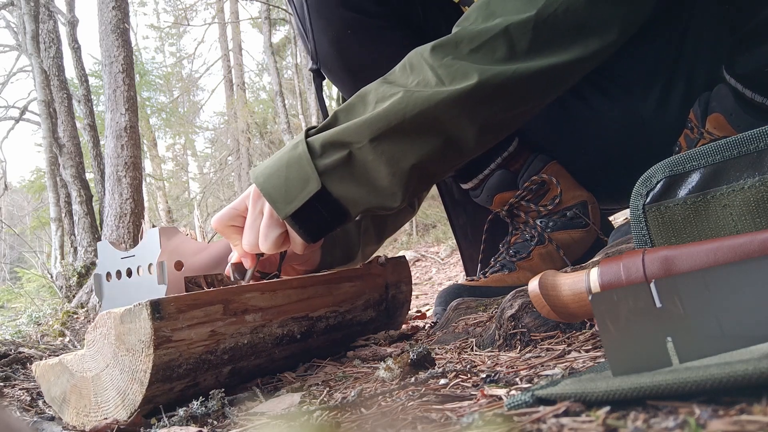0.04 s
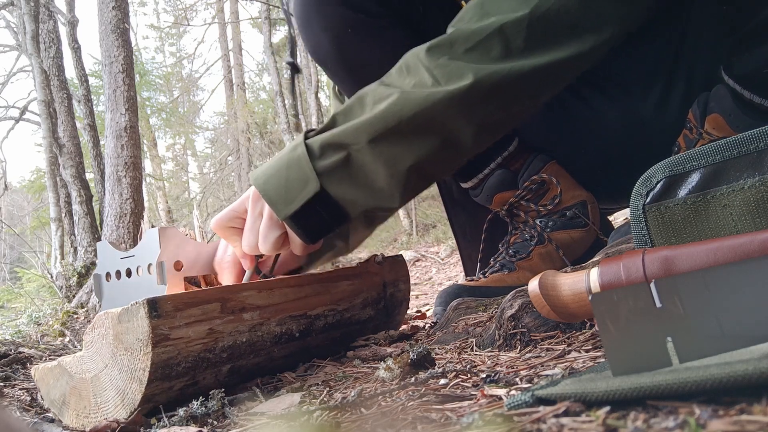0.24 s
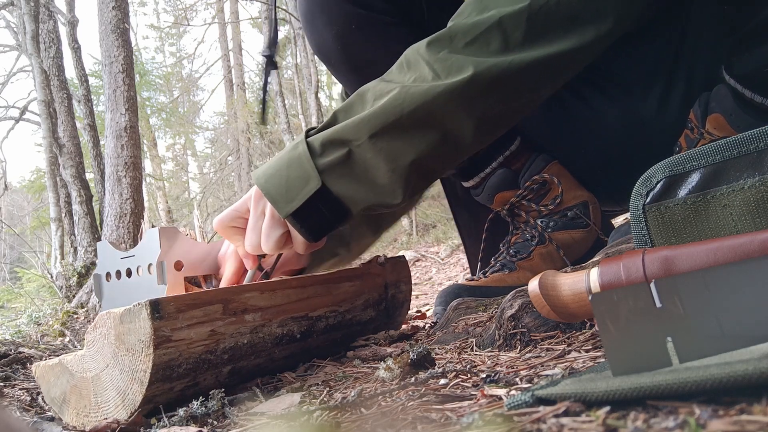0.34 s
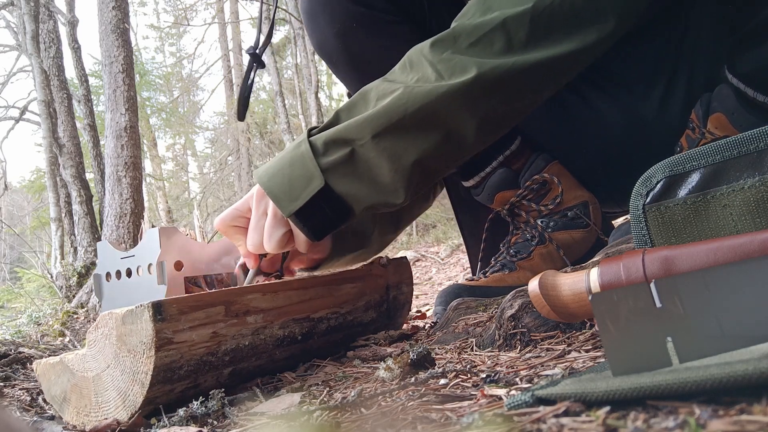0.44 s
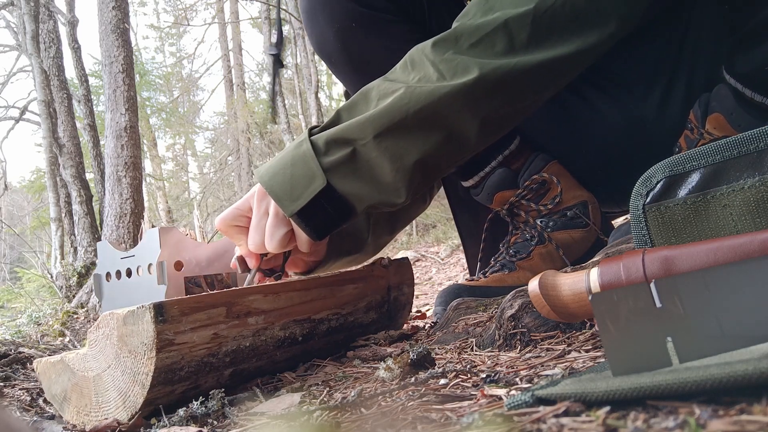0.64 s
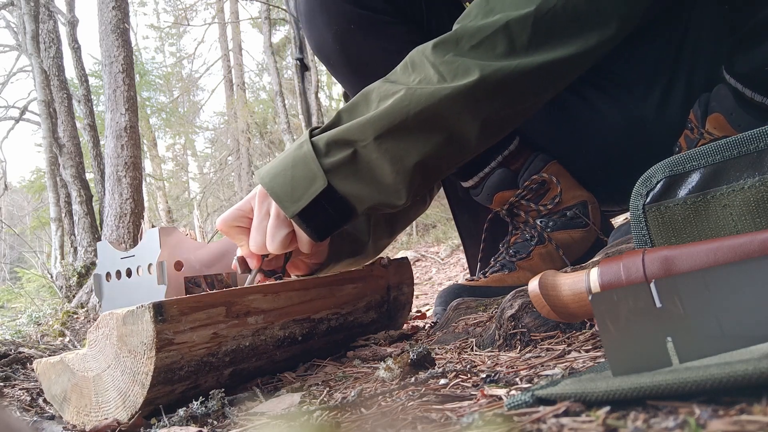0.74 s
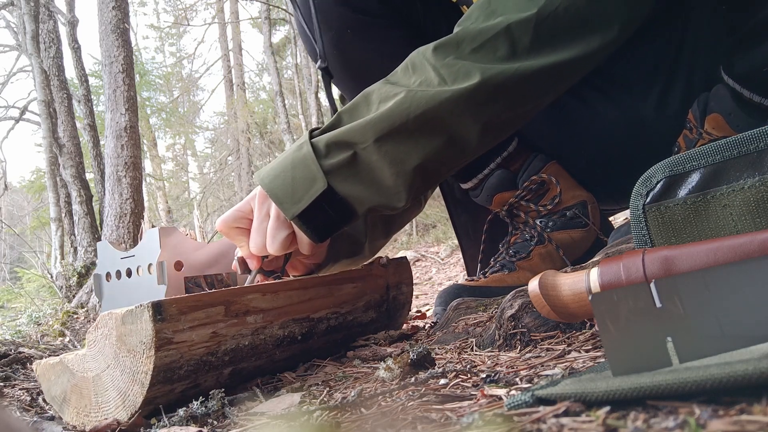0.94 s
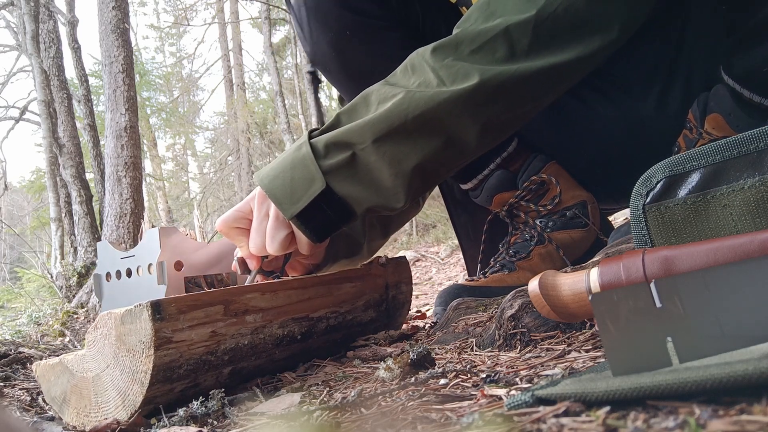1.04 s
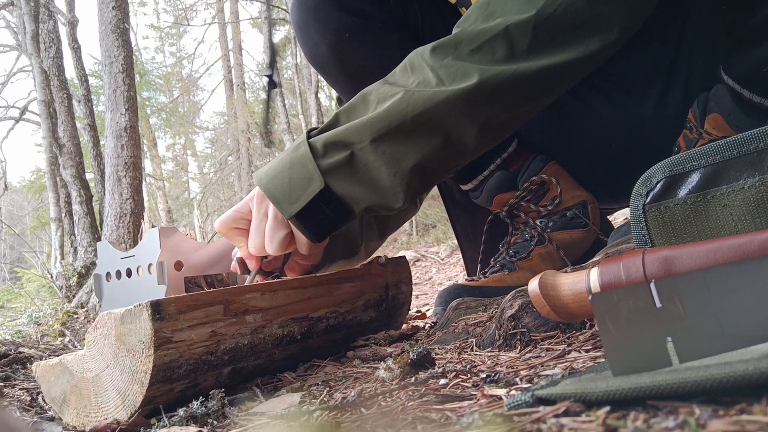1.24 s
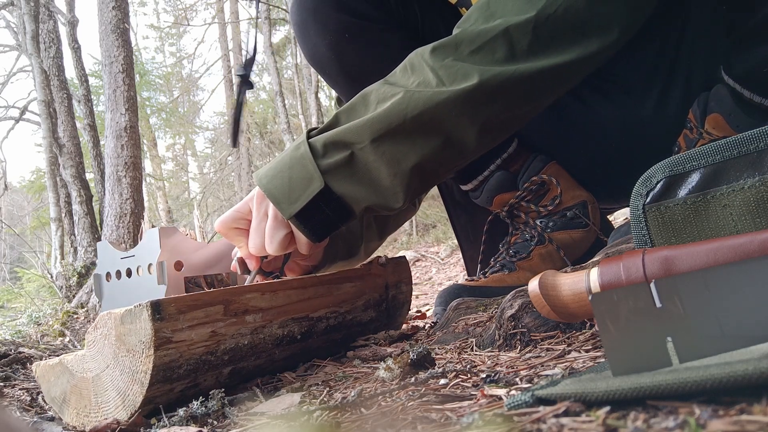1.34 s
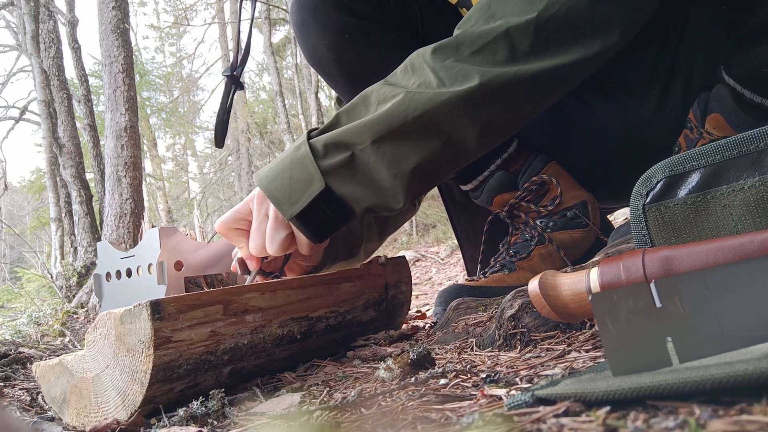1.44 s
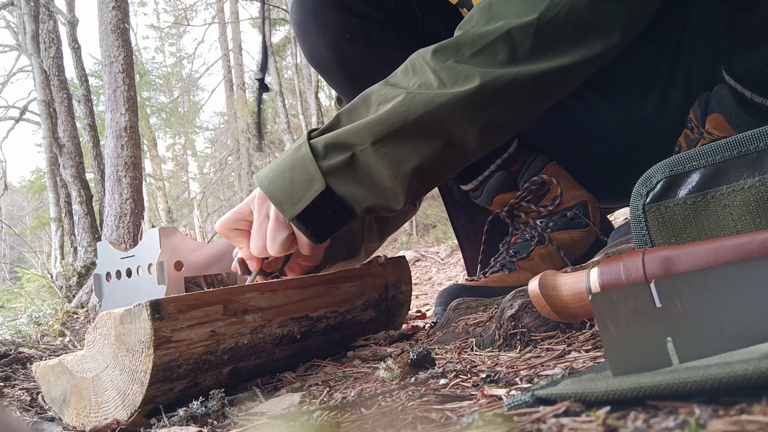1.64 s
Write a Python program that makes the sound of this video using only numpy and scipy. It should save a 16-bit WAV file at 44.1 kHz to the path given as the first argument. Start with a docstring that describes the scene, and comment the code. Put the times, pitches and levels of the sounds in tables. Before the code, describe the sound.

A metal striker scrapes sharply down a fire-starting rod at about 0.2 seconds, close, gritty and ringing. A hand thumps dully on a log at 0.3 seconds as short rasps trail off. The striker slides lightly back from 0.5 seconds, ending in a click and wooden knock at 0.7. Lighter clicks come at 1.4 and 1.7 seconds, over faint, low forest air.

```python
"""A steel striker scrapes down a ferro rod braced on a split log, close by in a quiet forest.
Stick-slip friction drives the rod's modes and tears off hissing grit; the edge skids on in short rasps
while the hand thumps the log, then slides lightly back. Impacts knock the log and click the striker
as the tools are set for the next stroke. Behind them lie a faint echo from the trunks,
low wavering air and two thin, distant whistles."""
import sys
import numpy as np
from scipy import signal
from scipy.fft import rfft, irfft
from scipy.io import wavfile
from scipy.ndimage import uniform_filter1d

SR = 44100
rng = np.random.default_rng(int(sys.argv[2]) if len(sys.argv) > 2 else 0)


def store_wav(level_fs):
    """Save 16-bit WAV to argv[1]."""
    pcm = np.round(np.clip(np.atleast_2d(level_fs), -1, 1) * 32767)
    wavfile.write(sys.argv[1], SR, pcm.T.astype(np.int16))


N = 74970

# spectrum of grit torn from the rod (frequency [Hz], relative level [dB])
GRIT_SPECTRUM = [(200, -11), (1000, -2.5), (2200, -0.5), (3300, -3), (4400, -2), (6000, -6), (7700, -5),
                 (9300, -12), (10400, -8), (11400, -1.5), (13800, -7.5), (15000, -9), (16000, -13.5)]
CHATTER_HZ = 447.94  # rate at which the edge's grip wanders


def scrape():
    """Frictional excitation: one train of catches rings the rod, tears off grit and shakes the log."""
    # force on the striker in the main stroke (time [s], level [dB])
    stroke = [(.212, -43.5), (0.219, -27), (0.225, -17.5), (.238, -13.5), (.245, -5), (.256, -4),
              (.268, -3), (.28, 2.5), (.286, -3), (.294, -19.5)]
    # skids after it (peak time [s], rise [s], fall [s], rod [dB], grit [dB], wood [dB])
    skids = [(.298, 0.003, .012, -30, -41, -39.5), (.304, 0.0056, .010, -24.5, -47, -30),
             (.321, 0.0091, .016, -31, -42, -38), (.336, 0.0095, .006, -33.5, -32, -26.5),
             (.344, 0.011, .012, -29.5, -36, -28), (.357, 0.004, .018, -37.5, -53, -40),
             (0.377, 0.024, 0.019, -45.5, -39, -33), (.387, 0.0042, .010, -36, -41, -33.5),
             (0.401, 0.0091, 0.025, -80, -51.5, -50), (0.424, 0.0072, .016, -59, -39.5, -34),
             (.438, 0.0053, .012, -41.5, -42, -43), (.452, 0.0084, .008, -32.5, -36.5, -35.5),
             (.471, 0.013, .009, -48.5, -43, -34.5), (0.487, 0.023, .028, -76, -50.5, -46)]
    times, levels = np.array(stroke).T
    force = undb(np.interp(np.arange(N) / SR, times, levels, left=-120, right=-120))
    rod = force * undb(-23.5)
    grit = force ** 1.27 * undb(-33)  # grit and wood grow faster than the force
    wood = force ** 1.6 * undb(-35)
    for peak, rise, fall, rod_db, grit_db, wood_db in skids:
        contact = swell(peak, rise, fall)
        rod += contact * undb(rod_db)
        grit += contact * undb(grit_db)
        wood += contact * undb(wood_db)
    catches = friction()
    # friction keeps the rod's modes sounding, so their ring follows the contact closely
    ringing = rod * squeal(catches) * undb(2.0 * walk(CHATTER_HZ))
    return ringing + colour(catches * grit, GRIT_SPECTRUM) + log_knock(catches * wood)


def friction(catches_per_s=7000, spread_db=4, chatter_db=2.5):
    """Stick-slip: the edge catches in tiny random impulses, uneven in size and bunched by chatter."""
    caught = rng.random(N) < catches_per_s / SR
    size_db = spread_db * np.clip(rng.standard_normal(N), -2, 2) + chatter_db * walk(CHATTER_HZ)
    return unit(caught * undb(size_db) * np.sign(rng.standard_normal(N)))


def squeal(catches, bite_s=0.28, evenness=.65):
    """Sustained vibration: friction holds each rod mode nearly even; the low ones fade with travel."""
    # modes of rod and striker pressed together
    # (frequency [Hz], bandwidth [Hz], relative level [dB], drift as the edge travels [dB/s])
    pressed_modes = [(1112, 16, -5, -50), (1280, 110, -12, -35), (1570, 70, -15, -20), (1778, 24, -8, 0),
                     (1852, 26, -11, 22), (2040, 90, -14, 0), (2246, 16, -8, -12), (2630, 40, -23, 10),
                     (2970, 70, -19, 0)]
    travel_s = np.clip(np.arange(N) / SR - bite_s, -.1, .3)
    out = 0
    for hz, width, db, db_per_s in pressed_modes:
        mode = band(ring(catches, [(hz, width, 0)]), hz * 0.88, hz * 1.2, order=2)
        envelope = np.abs(signal.hilbert(mode)) + 1e-9
        out += unit(mode / envelope ** evenness) * undb(db + db_per_s * travel_s)
    return out


def log_knock(force):
    """Damped resonance: the log's broad, low modes answer a force dully, with little treble."""
    # modes of the log (frequency [Hz], bandwidth [Hz], relative level [dB])
    log_modes = [(178, 53, 0.5), (327.4, 110, -4.5), (580, 130, 2.5), (776, 150, -4), (966, 59, -17.5)]
    return band(ring(force, log_modes), 110, 1200, order=2)


def thud():
    """Soft impact: the hand's long contacts drive the low modes of log and ground."""
    # pushes of the hand (time [s], contact time [s], level [dB])
    pushes = [(.276, 0.0038, -7), (0.305, 0.0064, 12), (.32, 0.0064, 15.5), (.335, 0.0058, 4),
              (0.383, 0.0044, 1), (0.671, .003, -21), (1.404, 0.0025, -24.5)]
    # modes of the log on the ground (frequency [Hz], bandwidth [Hz], relative level [dB])
    deep_modes = [(58, 12.9, -8), (116.6, 38, -8), (139.7, 18, 2), (195, 44, -9)]
    force = sum(undb(db) * blow(at, contact) for at, contact, db in pushes)
    return band(ring(force, deep_modes), 44, 600, order=3)


def slide_back(chatter_db=3, chatter_hz=161):
    """Light sliding friction: the unloaded edge stutters and rings the rod thinly, with a little grit."""
    # slides back along the rod (peak time [s], rise [s], fall [s], level [dB])
    slides = [(0.55, 0.0051, 0.013, -45), (0.568, 0.023, 0.048, -52.5), (0.602, 0.024, 0.045, -60),
              (.635, 0.019, 0.021, -52.5), (0.685, 0.027, 0.028, -56), (0.726, 0.053, 0.026, -59)]
    # modes of rod and striker barely touching (frequency [Hz], bandwidth [Hz], relative level [dB])
    loose_modes = [(1090, 30, -1.5), (1785, 66, -3), (1878, 35, -2), (2140, 56, -0.5), (2213, 30, -0.5),
                   (2590, 55, -8), (2895, 100, -7.5), (4535, 200, -8.5), (5800, 220, -25), (6740, 185, -34),
                   (8200, 130, -11), (8540, 90, -31.5)]
    contact = sum(undb(db) * swell(peak, rise, fall) for peak, rise, fall, db in slides)
    force = friction() * contact * undb(chatter_db * walk(chatter_hz) - 1.0)
    ringing = band(ring(force, loose_modes), 1050, 8700, order=6)
    return ringing + undb(-16) * colour(force, GRIT_SPECTRUM)


def knocks():
    """Hard impact: each brief contact rings both log and striker, with a short gritty drag."""
    # tools striking the log (time [s], relative wood level [dB], relative click level [dB])
    impacts = [(.5505, -13.5, -34.5), (.6725, -22, -37), (0.7144, -12.5, -32), (0.7181, -10, -14),
               (0.7195, 2, -3), (0.722, -9, -2), (1.3971, -20.5, -12), (1.4045, -20.5, -20.5),
               (1.406, -14.5, -15), (1.685, -22.5, -33)]
    # modes of the striker (frequency [Hz], bandwidth [Hz], relative level [dB])
    striker_modes = [(3080, 360, -12), (4004, 370, 1), (4520, 210, -6.5), (5215, 320, -5.5),
                     (6600, 250, -7.5), (6530, 200, 4), (8310, 280, -4.5), (9500, 240, -14.5),
                     (10130, 280, -1), (11770, 170, 9), (12100, 380, -0.5), (12870, 330, 7),
                     (13700, 600, -6.5)]
    wood = sum(undb(db) * blow(at, contact=0.00038) for at, db, _ in impacts)
    tap = sum(undb(db) * (np.arange(N) == int(at * SR)) for at, _, db in impacts)
    drag = sum(undb(db) * swell(at, 0.0013, .004) for at, _, db in impacts)
    click = ring(undb(-18.5) * tap + undb(-30.5) * drag * friction(), striker_modes)
    return undb(-8) * log_knock(wood) + click


def touches():
    """Transient friction: the edge scratches stiffly on the rod as it finds its place."""
    # touches of the edge (time [s], level [dB], fall [s])
    contacts = [(.5507, -36.5, 0.0035), (.592, -56.5, .002), (.637, -54, 0.0026), (.644, -62, 0.0017),
                (.6728, -46, 0.0045), (.691, -58.5, .002), (.745, -57.5, 0.0016), (1.092, -68, 0.004)]
    # spectrum of a touch (frequency [Hz], relative level [dB])
    spectrum = [(300, -23.5), (580, 8), (1200, -13.5), (1800, 4.5), (2800, 2.5), (3600, -1), (4400, 0.5),
                (5300, -4), (7000, 2.5), (8500, -4.5), (9300, -27), (16000, -31)]
    return scratches(contacts, spectrum)


def ticks():
    """Transient friction: tiny scratches of the striker, their energy mostly in the treble."""
    # scratches of the striker (time [s], level [dB], fall [s])
    contacts = [(.533, -52, 0.025), (.664, -51, 0.0055), (.7125, -53.5, 0.0032), (1.029, -62.5, 0.0053),
                (1.366, -66, 0.004), (1.378, -62.5, 0.008), (1.401, -46, 0.016), (1.671, -57, 0.0099),
                (1.683, -58, .008), (1.69, -51, 0.0034)]
    # spectrum of a tick (frequency [Hz], relative level [dB])
    spectrum = [(300, -8), (900, 0.5), (1900, -20), (2900, -8), (4100, 0), (5500, -9.5), (6800, 8),
                (9200, -23.5), (10300, 5.5), (11000, -1.5), (12500, 4.5), (16000, -5.5)]
    return scratches(contacts, spectrum)


def scratches(contacts, spectrum):
    """Source and filter: brief contacts gate the friction, and a spectrum colours it."""
    envelope = sum(undb(db) * swell(at, 0.002, fall) for at, db, fall in contacts)
    return colour(friction() * envelope, spectrum)


def trunk_echo(sound, t60_s=0.17, level_db=-27):
    """Scattering: dense reflections from the trunks build up, then decay exponentially."""
    t = np.arange(N) / SR
    reflections = rng.standard_normal(N) * undb(-60 * t / t60_s) * (1 - np.exp(-t / .01))
    # spectrum of the echo (frequency [Hz], relative level [dB])
    spectrum = [(100, -1), (1000, -4), (4000, -11.5), (16000, -13.5)]
    return undb(level_db) * through(sound, colour(reflections, spectrum))


def forest(level_db=-62.5, waver_db=.8, waver_hz=5.3):
    """Ambient noise: low, distant air under a slight random amplitude modulation."""
    # spectrum of the forest air (frequency [Hz], relative level [dB])
    spectrum = [(15, -46.5), (25, -22), (48, -16.5), (70, -12), (102, -8.5), (153, -1.5), (249, -14.5),
                (301, -8), (416, -18), (591, -12.5), (659, -17.5), (796, -20.5), (2110, -38), (3720, -40),
                (5430, -48.5), (11900, -44), (16000, -45)]
    air = colour(rng.standard_normal(N), spectrum)
    return undb(level_db) * air * undb(waver_db * walk(waver_hz))


def whistles():
    """Narrow-band noise is heard as pitch: thin, high whistles far off in the trees."""
    # whistles (peak time [s], rise [s], fall [s], frequency [Hz], bandwidth [Hz], level [dB])
    tones = [(.01, .05, 0.15, 7350, 300, -76.5), (.895, 0.052, .06, 3720, 250, -83.5)]
    out = 0
    for peak, rise, fall, hz, width, db in tones:
        tone = unit(band(rng.standard_normal(N), hz - width / 2, hz + width / 2, order=1))
        out += undb(db) * swell(peak, rise, fall) * tone
    return out


def ring(force, modes):
    """Modal superposition: each mode is a cosine that decays faster the wider its bandwidth."""
    t = np.arange(N // 4) / SR
    response = sum(undb(db) * width * np.exp(-np.pi * width * t) * np.cos(2 * np.pi * hz * t)
                   for hz, width, db in modes)
    return through(force, response)


def colour(x, spectrum, size=4096):
    """Minimum-phase filtering through (frequency [Hz], relative level [dB]) points."""
    hz, db = np.array(spectrum).T
    bin_hz = np.maximum(np.arange(size // 2 + 1) * SR / size, 1)
    gain = undb(np.interp(np.log(bin_hz), np.log(hz), db))
    cepstrum = irfft(np.log(gain))
    cepstrum[1:size // 2] *= 2  # folding onto positive time makes the filter causal
    cepstrum[size // 2 + 1:] = 0
    return through(x, irfft(np.exp(rfft(cepstrum))))


def through(x, response):
    """Convolution with an impulse response scaled to unit energy."""
    return signal.fftconvolve(x, response / np.linalg.norm(response))[:N]


def band(x, lo_hz, hi_hz, order=4):
    """Band-pass filtering with a maximally flat passband."""
    return signal.sosfilt(signal.butter(order, [lo_hz, hi_hz], "band", fs=SR, output="sos"), x)


def blow(at, contact):
    """A force pulse of unit area: the longer the contact, the less treble it holds."""
    t = np.arange(N) / SR - at
    push = np.exp(-np.minimum((2 * t / contact) ** 2, 20)) - np.exp(-20)
    return push / push.sum()


def swell(peak, rise, fall):
    """An amplitude envelope, down to a tenth `rise` seconds before its peak and `fall` seconds after."""
    t = np.arange(N) / SR - peak
    distance = np.abs(t / np.where(t < 0, rise, fall))
    return 10 ** -np.minimum(distance ** 1.223, 10)


def walk(rate_hz):
    """Random modulation: smoothed steps of rms 1."""
    hold = max(int(SR / rate_hz), 1)
    steps = np.repeat(rng.standard_normal(N // hold + 1), hold)
    return unit(uniform_filter1d(steps, hold)[:N])


def undb(db):
    """Decibels to amplitude ratio."""
    return 10 ** (np.asarray(db) / 20)


def unit(x):
    """Normalisation to rms 1."""
    return x / np.sqrt(np.mean(x ** 2))


def scene():
    """Superposition: the tools, their echo and the forest add in one channel."""
    tools = scrape() + thud() + slide_back() + knocks() + touches() + ticks()
    return (tools + trunk_echo(tools) + forest() + whistles())[None]


def record(dry, cutoff_hz=15750):
    """Band limiting: a steep low-pass filter removes the highest treble."""
    return signal.sosfilt(signal.ellip(10, .2, 80, cutoff_hz, fs=SR, output="sos"), dry)


dry = scene()
out = record(dry)
store_wav(out)
```